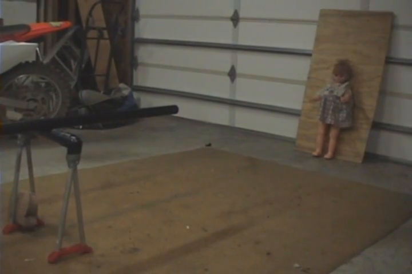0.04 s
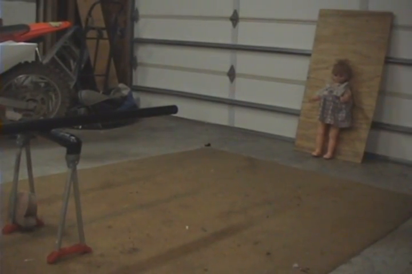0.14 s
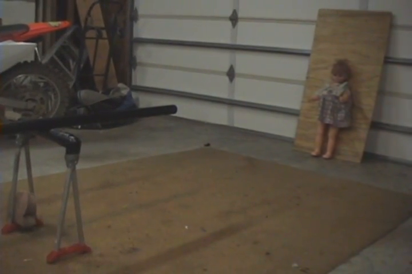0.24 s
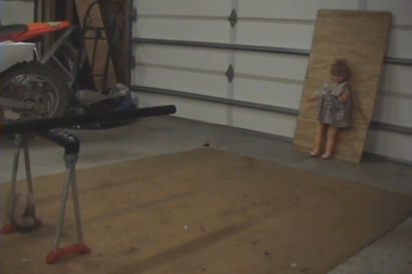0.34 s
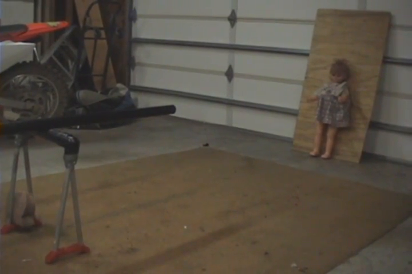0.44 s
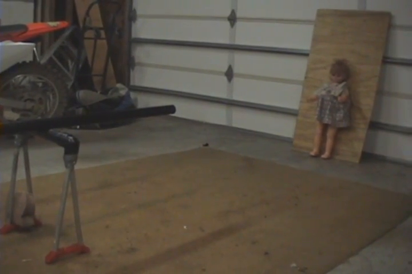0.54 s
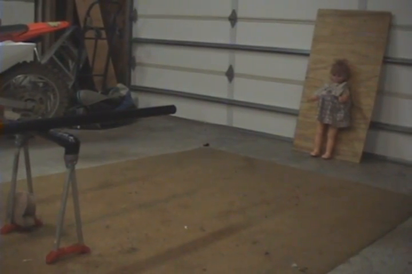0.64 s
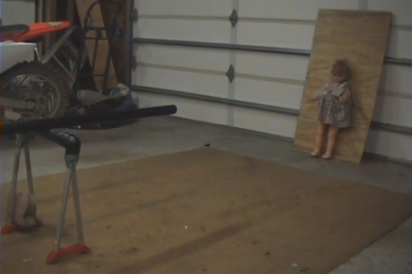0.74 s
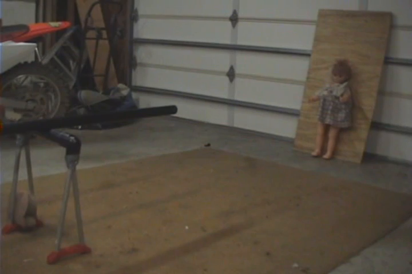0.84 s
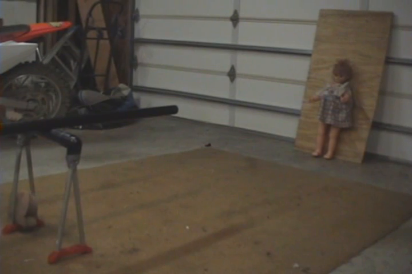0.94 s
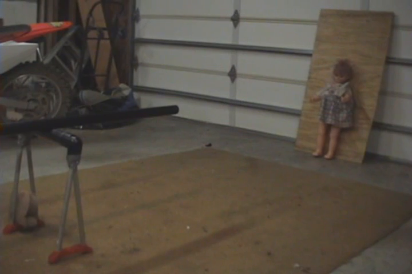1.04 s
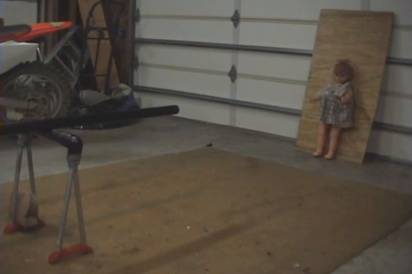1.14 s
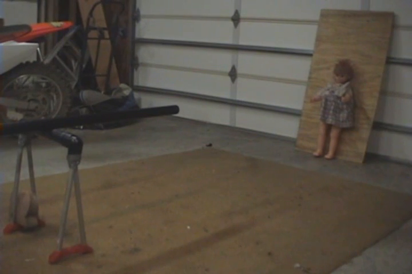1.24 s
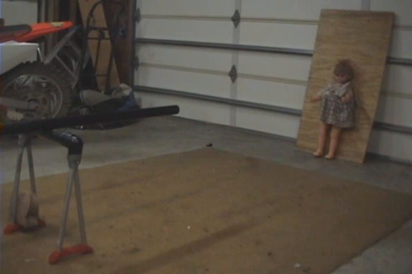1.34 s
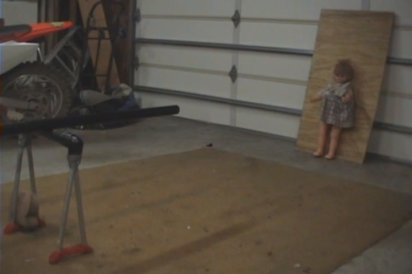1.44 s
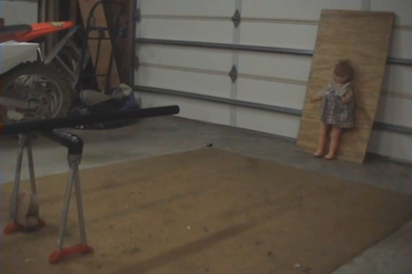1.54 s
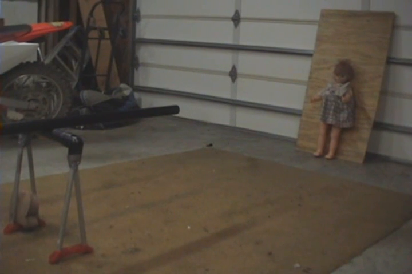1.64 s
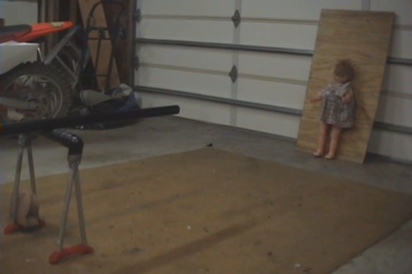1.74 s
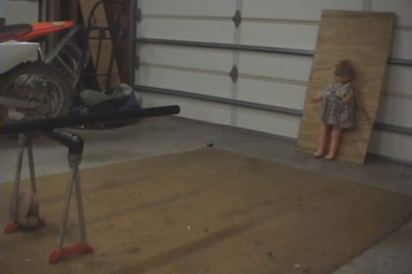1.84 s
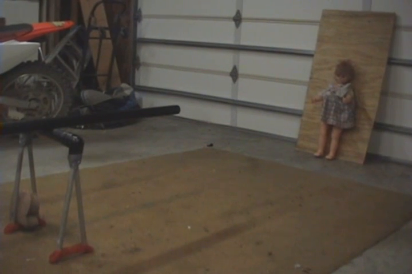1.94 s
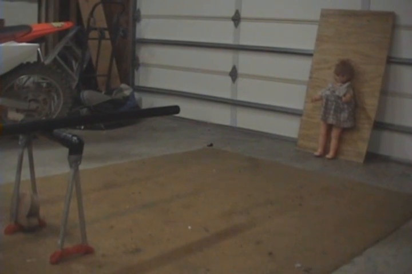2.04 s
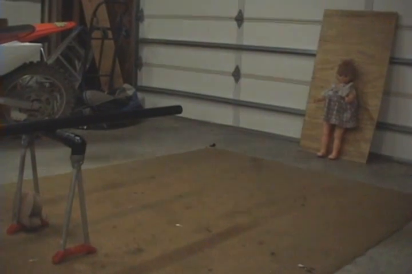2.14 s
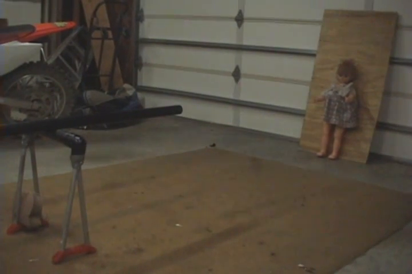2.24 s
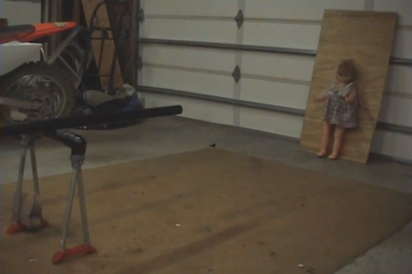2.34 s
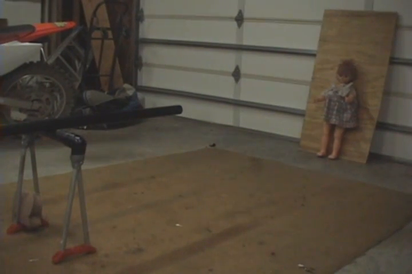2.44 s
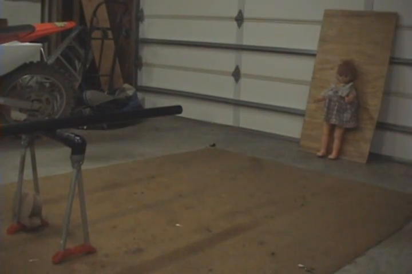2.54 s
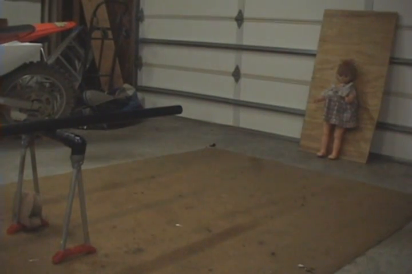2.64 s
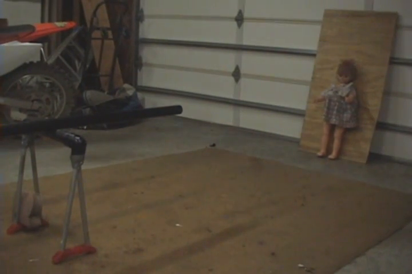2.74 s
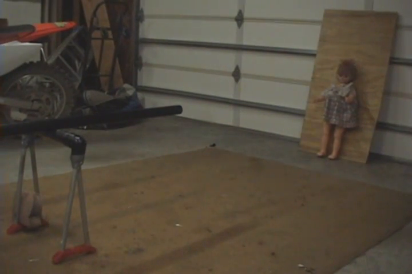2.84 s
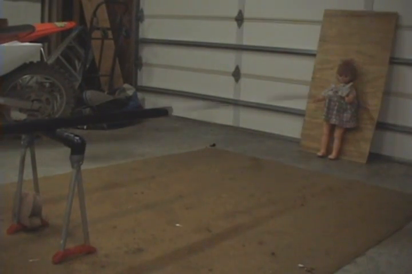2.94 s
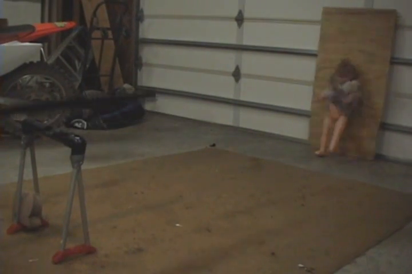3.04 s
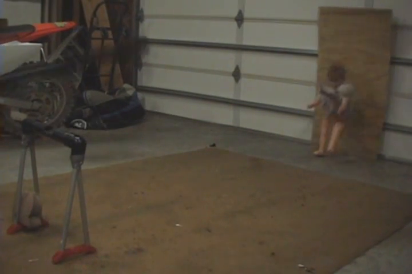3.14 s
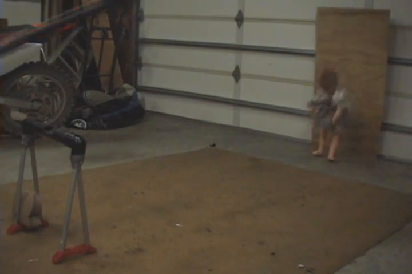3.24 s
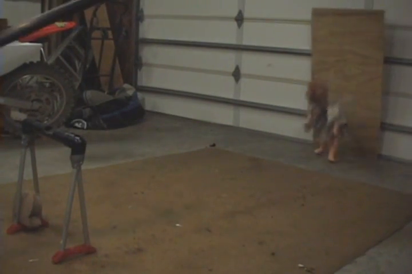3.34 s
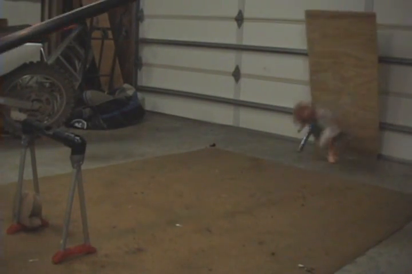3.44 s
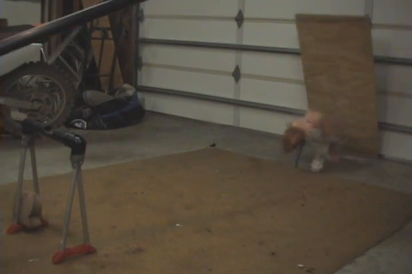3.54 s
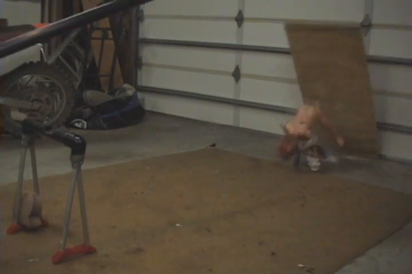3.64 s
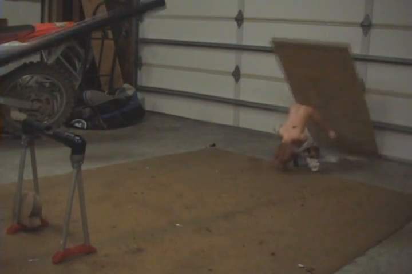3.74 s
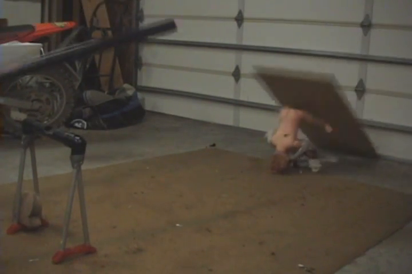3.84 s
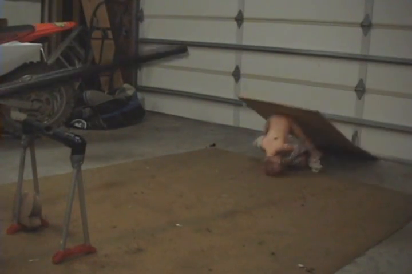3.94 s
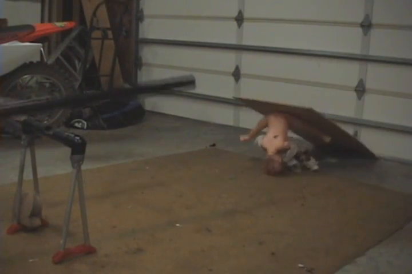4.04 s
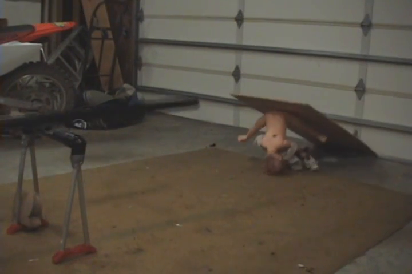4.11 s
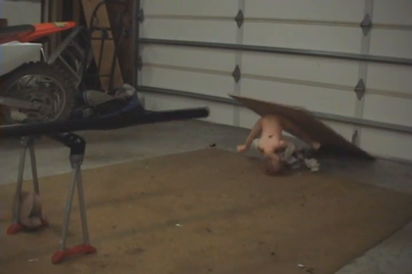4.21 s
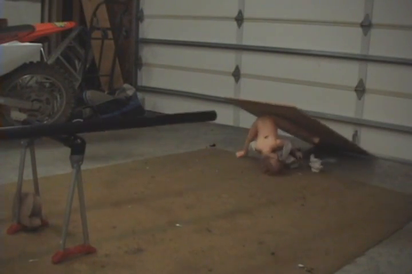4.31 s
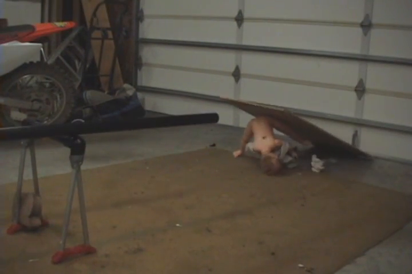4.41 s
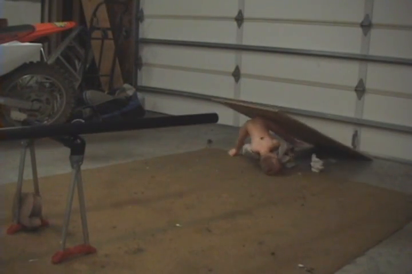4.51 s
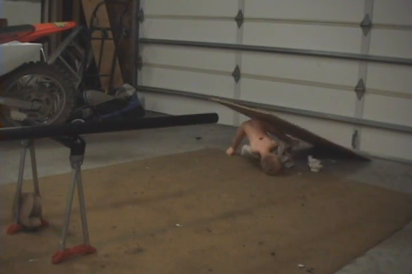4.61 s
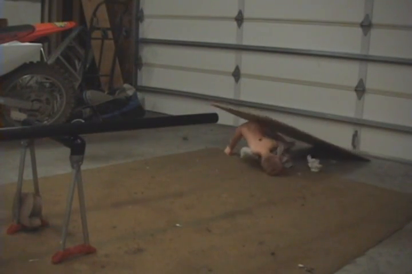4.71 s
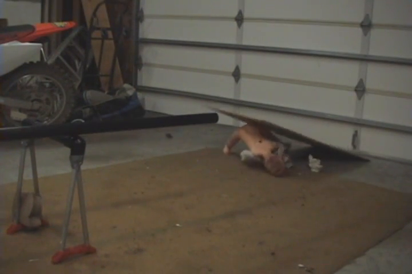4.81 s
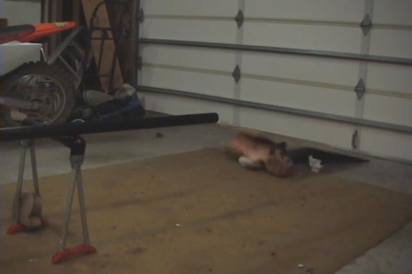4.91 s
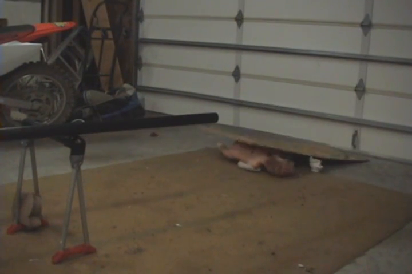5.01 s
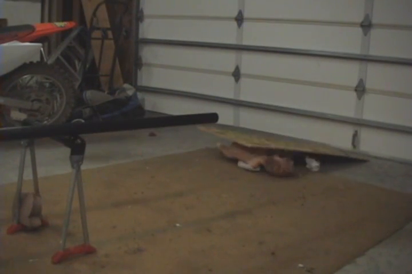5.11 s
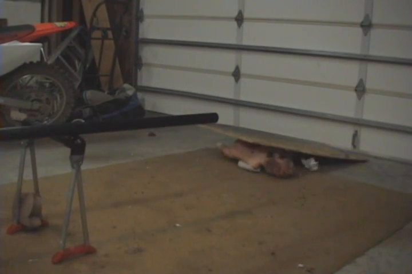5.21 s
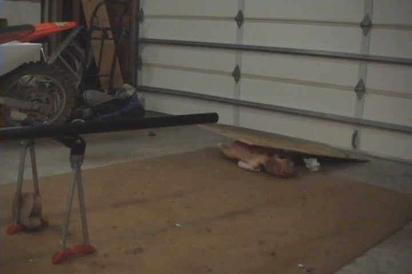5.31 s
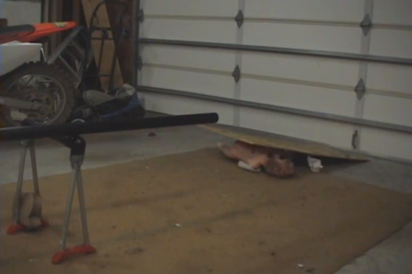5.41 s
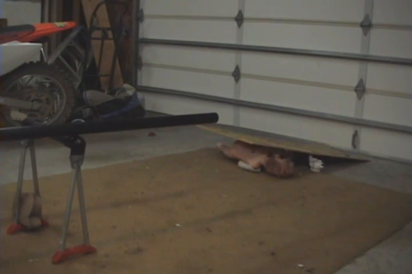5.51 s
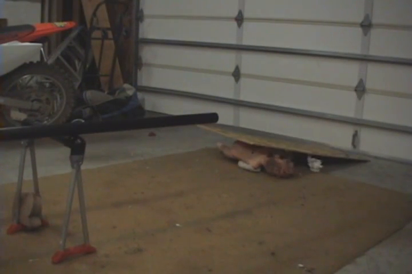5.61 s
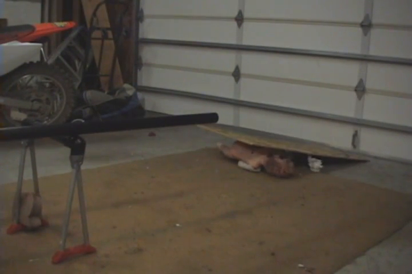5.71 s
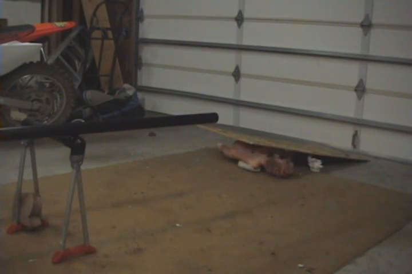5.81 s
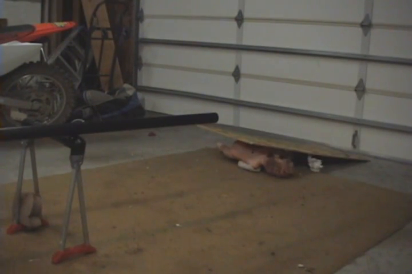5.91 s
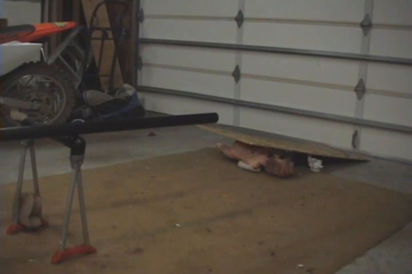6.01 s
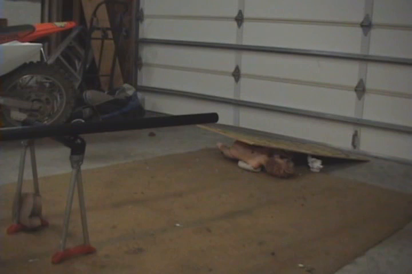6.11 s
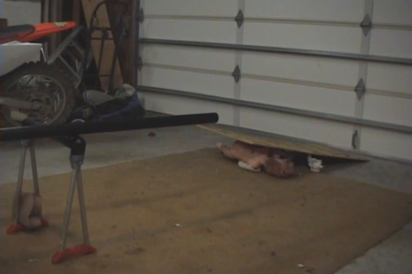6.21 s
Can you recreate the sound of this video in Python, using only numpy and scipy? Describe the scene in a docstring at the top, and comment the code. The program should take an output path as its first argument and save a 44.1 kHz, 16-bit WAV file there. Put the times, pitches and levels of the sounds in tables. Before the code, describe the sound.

Quiet garage rumble and small clicks, a sudden potato gun blast, then a hollow tumbling crash, a gritty scrape and bouncing board slaps.

```python
"""A few small plastic clicks and faint rustles over the rumble of a closed garage, then a potato gun fires.
The blast, noise bursts with a floor echo, overloads the camera's microphone and booms on in the room,
while steelwork and loose fittings ring as sines. A plywood board and a doll are knocked over and clatter
on the concrete, as filtered noise blows and short plastic bursts. Last the board slips off the doll
with a gritty scrape and slaps down in several bounces."""
import sys
import numpy as np
from scipy import signal
from scipy.fft import rfft, irfft, next_fast_len
from scipy.io import wavfile
from scipy.ndimage import uniform_filter1d, minimum_filter1d, map_coordinates

SR = 44100
rng = np.random.default_rng(int(sys.argv[2]) if len(sys.argv) > 2 else 0)


def waveform_to_disk(signal):
    """Save audio, clipped to [-1, 1], as 16-bit WAV at the path in sys.argv[1]."""
    frames = np.transpose(np.atleast_2d(signal))
    scaled = np.clip(frames, -1, 1) * 32767
    samples = np.round(scaled).astype(np.int16)
    wavfile.write(sys.argv[1], SR, samples)


N = 276319

SHOT_S = 3.0338  # the blast reaches the microphone

# Room rumble and its level before the overall trim: (frequency [Hz], density [dB per Hz]), (time [s], level [dB])
RUMBLE_SPECTRUM = [(12, -27.5), (20, -3.5), (43, 1), (174, -5), (260, -4), (300, -5.5), (759, -11.5),
                   (823, -11.5), (1090, -27.5), (2500, -31), (3250, -65.5), (5500, -120)]
RUMBLE_LEVEL = [(0.0, -54), (0.46, -52), (1.73, -51.5), (2.03, -51.5), (2.28, -55), (2.98, -57.5)]
# Microphone hiss: (frequency [Hz], density [dB per Hz])
HISS_SPECTRUM = [(350, -50), (600, -7), (800, -9.5), (1080, -5), (1220, -10.5), (1350, -10.5), (2120, -16),
                 (5540, -22), (11900, -33), (15400, -82), (22000, -120)]
# Faint steady tones: (frequency [Hz], start [s], end [s], rms level [dB])
WHINES = [(798, 0.046, 2.21, -64), (1064, 2.24, 2.46, -60.5)]
# Faint handling rustles: (start [s], length [s], level [dB])
RUSTLES = [(0.388, 0.031, -42), (1.08, .05, -54), (2.486, 0.072, -47), (5.803, 0.19, -52.5)]
# Colour of the rustles: (frequency [Hz], density [dB per Hz])
RUSTLE_SPECTRUM = [(200, -6), (700, 5.5), (1900, -3), (4000, -14.5), (11000, -23)]
# Small clicks before the shot: (time [s], level [dB], snap brightness [dB], pitch [ratio])
CLICKS = [(0.4233, -29, 11.5, 0.98), (1.663, -33, -19, 0.58), (1.6669, -30, -0.5, 0.82),
          (1.7081, -33.5, -22, 0.64), (1.919, -40, -24, 0.77), (2.0631, -20, -25, 0.96),
          (2.094, -35.5, -27, 0.445), (2.977, -47, 12, 0.98)]
# Modes of the clicking plastic at pitch ratio 1: (frequency [Hz], mean level [dB], decay t60 [s])
PLASTIC_MODES = [(670, -16, 0.013), (1006, 4.5, 0.021), (1420, 1, 0.0042), (1908, 2.5, 0.023),
                 (3390, -4.5, 0.014), (4730, -15, 0.024)]
# Board edge scraping on concrete: (frequency [Hz], density [dB per Hz])
SCRAPE_SPECTRUM = [(300, 5), (1000, -3), (2500, 3.5), (5000, -1.5), (8000, -7.5), (11000, -21)]
# Loose fittings and hard parts that ring when struck: (time [s], centre [Hz], level [dB], decay t60 [s])
RATTLES = [(3.159, 3160, 0, 0.4), (3.315, 3270, -8.5, .25), (3.425, 4210, -24, 0.42),
           (3.862, 4050, -29.5, 0.18), (3.929, 2300, -24, .16), (4.322, 4740, -27.5, 0.23)]
# The doll's hard plastic head and limbs clacking: (time [s], level [dB])
CLACKS = [(3.333, -8), (3.9309, -11.5), (4.0337, -8), (4.0542, -23), (4.082, -10.5), (4.128, -13),
          (4.253, -11.5)]
# Hollow plastic of the doll: (frequency [Hz], density [dB per Hz])
DOLL_SPECTRUM = [(400, -17), (1300, -5), (1800, 0), (2650, 3), (3300, -6), (5500, -10.5), (12000, -41)]
# Loose board dropping on the doll and slapping the floor; a low thud is a glancing edge:
# (time [s], strength [dB], hardness [0-1], thud [dB])
SLAPS = [(4.592, -6, 0.22, -5), (4.729, -16.5, 0.29, 0.5), (4.864, -24.5, 0.27, 11.5),
         (4.939, -10.5, 0.62, 6.5), (5.117, -19.5, 0.77, 3), (5.126, -13.5, 0.89, 2.5),
         (5.153, -4.5, 0.28, 3.5), (5.301, -10.5, 0.22, -4), (5.342, -1, 0.35, -4),
         (5.407, -17, 0.08, 10.5), (5.515, -11, 0.29, -8), (5.574, -18, 0.24, 4)]
# Colour of the slapping plywood: (frequency [Hz], gain [dB])
PLYWOOD_SPECTRUM = [(45, -4.5), (95, -4), (170, 13.5), (245, 17.5), (500, 13), (1000, 9.5), (2450, 7),
                    (6600, -2), (10000, -0.5), (12000, -27)]
# Resonances of the loose board: (frequency [Hz], width [Hz], level [dB])
BOARD_MODES = [(160.6, 21, 1), (243.2, 9.4, 5.1), (304.6, 9.1, 3.8), (347, 11, 5.8), (377.5, 11, 1.6),
               (456.4, 29, 7.4), (530.5, 12, 2.6), (604, 31, 4.2), (755, 45, 6.7), (1062, 25, 9.8),
               (1128, 20, 4.9), (1180, 12, -5), (1354, 20, 1.5), (1445, 10, 1.5)]
# Board and doll tumbling against the door and onto the floor; a low thud is a glancing edge:
# (time [s], strength [dB], hardness [0-1], thud [dB])
BLOWS = [(3.256, 0, 0.7, -7), (3.305, 7, 0.83, -4.5), (3.385, 14.5, 0.08, -7.5), (3.495, 6.5, 0.29, 0),
         (3.581, 0, 0.21, 1.5), (3.621, -3, 0.25, -6), (3.65, -12.5, 0.59, 4.5), (3.701, -10.5, 0.59, 5),
         (3.761, -10.5, 0.52, 4.5), (3.862, -16.5, 1, 2), (3.971, 0.5, 0.24, -1.5),
         (4.033, -10.5, 0.35, 1.5), (4.053, -2, .56, -0.5), (4.08, -4, 0.64, -2.5), (4.098, 2.5, 0.46, -7),
         (4.127, -1, 0.42, 0.5), (4.177, -2.5, 0.35, 0), (4.252, -8, 0.43, 5), (4.321, -6.5, 0.76, 1),
         (4.357, -4, 0.54, -3.5), (4.412, -12, 0.85, 2), (4.489, -15.5, 0.66, 7)]
# Colour of the tumbling: (frequency [Hz], gain [dB])
TUMBLE_SPECTRUM = [(45, -6.5), (95, -2), (170, 14.5), (245, 17.5), (870, 11.5), (2450, 7.5), (6600, 2.5),
                   (10000, 2.5), (12000, -32)]
# Resonances of the garage door: (frequency [Hz], width [Hz], level [dB])
DOOR_MODES = [(107.6, 10, -1.5), (150.3, 7.7, 9), (220, 8, -3.5), (282.5, 6, 3), (399.7, 26, 3),
              (447.5, 19, 0), (661, 9.8, 4), (696, 26, -3.5), (867, 19, -7), (1057, 26, -6), (1473, 27, -1),
              (3200, 190, -13), (5260, 130, -10)]
# Steel tracks and hinges set ringing by the blast: (frequency [Hz], relative level [dB])
STEEL_MODES = [(2828, 1), (2895, 4.5), (3016, -3), (3091, -2.5), (3212, -0.5), (3612, 0.5), (5123, -4),
               (5286, -5)]
# Bright crack of the blast: (frequency [Hz], density [dB per Hz])
CRACK_SPECTRUM = [(40, -10), (200, 1.5), (800, 2), (1600, 4.5), (3200, 5.5), (5500, 0.5), (8000, 0),
                  (11000, -5.5)]
# Dark boom of the blast: (frequency [Hz], density [dB per Hz])
BOOM_SPECTRUM = [(30, -22.5), (60, -14.5), (95, -21), (150, -10), (230, 1), (450, -6), (900, 0),
                 (1800, -5.5), (3200, -11.5), (5500, -17), (8000, -19), (11000, -14)]
# Reverberation of the garage before any stretch: (frequency [Hz], decay t60 [s])
GARAGE_DECAY = [(60, 1), (150, 0.61), (300, 0.68), (1000, 0.51), (3000, 0.45), (6000, 0.41), (11000, 0.26)]
# Left-right likeness of echoing sound, quiet sounds near the microphone, and sharp cracks:
# (frequency [Hz], likeness [0-1])
ECHO_ALIKE = [(30, 0.74), (60, 1), (130, 1), (270, 0.99), (570, 0.93), (1200, 0.85), (2500, 0.81),
              (5400, 1), (11000, 1)]
NEAR_ALIKE = [(60, 0.82), (140, 0.72), (350, 0.35), (830, 0.075), (1990, 0.28), (4760, 0.98), (11400, 1)]
SHARP_ALIKE = [(60, 0.74), (200, 0.32), (1000, 0.45), (2500, 0.68), (6000, 1), (11000, 0.88)]
# Stereo balance of the events: (frequency [Hz], left minus right [dB])
LEFT_BALANCE = [(100, -1), (400, .5), (1100, 2), (2000, 2), (4000, 0), (10000, -0.5)]


def amp(db):
    """Decibels to gain."""
    return 10 ** (np.asarray(db) / 20)


def unit(x):
    """x at rms 1."""
    return x / np.sqrt(np.mean(x ** 2) + 1e-20)


def along(points, hz):
    """(Hz, value) points read on a log frequency axis."""
    f, v = np.transpose(points)
    return np.interp(np.log(hz + 1), np.log(f + 1), v)


def fade(t, t60):
    """Exponential decay by 60 dB in t60 seconds."""
    return np.exp(-np.log(1000) * t / t60)


def add(track, s, sound):
    """Mix a sound into the track at time s."""
    part = track[:, round(s * SR):][:, :sound.shape[-1]]
    part += sound[..., :part.shape[-1]]


def filtered(x, response):
    """x times a response of frequency."""
    n = x.shape[-1]
    padded = next_fast_len(n + SR // 2)
    spectrum = rfft(x, padded) * response(np.fft.rfftfreq(padded, 1 / SR))
    return irfft(spectrum, padded)[..., :n]


def shaped(x, spectrum):
    """x given a spectrum by a causal minimum-phase filter, so that nothing sounds before an attack."""
    size = 4096
    cepstrum = irfft(np.log(amp(along(spectrum, np.fft.rfftfreq(size, 1 / SR)))))
    cepstrum[1:size // 2] *= 2
    cepstrum[size // 2 + 1:] = 0
    impulse = irfft(np.exp(rfft(cepstrum)))
    return signal.fftconvolve(x, impulse[None], axes=1)[:, :x.shape[1]]


def ringing(x, modes):
    """x through a panel that rings on at its resonances."""
    def panel(f):
        return 1 + sum(amp(db) * 1j * f * w / (c * c - f * f + 1j * f * w) for c, w, db in modes)
    return filtered(x, panel)


def wobble(rate):
    """A smooth random curve with rate knots a second."""
    knots = rng.standard_normal(int(N * rate / SR) + 4)
    return map_coordinates(knots, [np.arange(N) * rate / SR])


def air(size, alike=ECHO_ALIKE):
    """White stereo noise whose mid and side shares set the left-right likeness."""
    def mid_side(hz):
        turn = np.arccos(np.clip(along(alike, hz), 0, 1)) / 2
        return np.array([np.cos(turn), np.sin(turn)])
    mid, side = filtered(rng.standard_normal((2, size)), mid_side)
    return np.array([mid + side, mid - side])


def coloured(spectrum, size, alike=ECHO_ALIKE):
    """Stereo noise of rms 1 with the given spectrum."""
    return unit(filtered(air(size, alike), lambda hz: amp(along(spectrum, hz))))


def reverberate(noise, stretch=1):
    """Noise whose frequencies each die at the garage's rate, slowed by stretch."""
    hz, t, z = signal.stft(noise, SR, nperseg=512)
    decay = amp(-60 * t / (stretch * along(GARAGE_DECAY, hz)[:, None]))
    return signal.istft(z * decay, SR, nperseg=512)[1][:, :noise.shape[-1]]


def background(rumble_db=3.0, hiss_db=-56, unsteady_db=0.5, swell_s=0.066):
    """Low, unsteady room rumble, microphone hiss and faint sine whines."""
    t = np.arange(N) / SR
    level_db = np.interp(t, *np.transpose(RUMBLE_LEVEL)) + rumble_db
    level_db = level_db + unsteady_db * wobble(rate=9.1)
    rumble = amp(level_db) * coloured(RUMBLE_SPECTRUM, size=N, alike=NEAR_ALIKE)
    hiss = amp(hiss_db) * coloured(HISS_SPECTRUM, size=N, alike=NEAR_ALIKE)
    whine = np.zeros(N)
    for hz, on, off, db in WHINES:
        gate = np.clip(np.minimum(t - on, off - t) / swell_s, 0, 1)
        whine += np.sqrt(2) * amp(db) * gate * np.sin(2 * np.pi * hz * t)
    return rumble + hiss + whine


def rustles(grain_db=3):
    """Short rubs: noise made grainy by a fast random level, swelling and fading."""
    envelope = np.zeros((2, N))
    for s, length, db in RUSTLES:
        swell = np.sin(np.linspace(0, np.pi, round(length * SR)))
        add(envelope, s, amp(db) * swell)
    grain = amp(grain_db * wobble(rate=380))
    return envelope * unit(coloured(RUSTLE_SPECTRUM, size=N, alike=NEAR_ALIKE) * grain)


def clicks(ring_db=-3, snap_db=-5, snap_t60=0.014, room_db=-16, room_follows=.6,
           echo_s=.0056, echo_db=-16, left_db=1):
    """Plastic parts click nearby: short modes, a snap, a near reflection; sharper snaps wake more room."""
    out, t = np.zeros((2, N)), np.arange(SR // 2) / SR
    snap_spectrum = [(300, -10), (2000, 0.5), (8000, -5), (12000, -13.5)]
    room_spectrum = [(150, -12.5), (900, 4.0), (2000, -6.5), (4000, -9.0), (11000, -17.0)]
    for s, db, bright_db, pitch in CLICKS:
        ring = np.zeros(len(t))
        for hz, level, t60 in PLASTIC_MODES:
            ring += amp(level + rng.normal()) * np.sin(2 * np.pi * hz * pitch * t) * fade(t, t60)
        snap = coloured(snap_spectrum, size=len(t), alike=NEAR_ALIKE) * fade(t, snap_t60)
        room = reverberate(coloured(room_spectrum, size=len(t), alike=NEAR_ALIKE), stretch=0.62)
        direct = amp(ring_db) * ring + amp(bright_db + snap_db) * snap
        add(out, s, amp(db) * (direct + amp(room_db + room_follows * bright_db) * room))
        add(out, s + echo_s, amp(db + echo_db) * direct)
    thin = shaped(out, [(100, -3), (300, -11), (600, -1.5)])  # small parts radiate little bass
    return amp([[left_db], [-left_db]]) * thin


def slide(start_s=4.6, drop_s=5.12, level_db=-44, swell_db_per_s=16, release_db_per_s=45,
          attack_s=0.064, grit_db=4):
    """The board's edge slips off the doll and drags ever louder over gritty concrete until it drops."""
    t = np.arange(N) / SR
    effort_db = np.minimum(swell_db_per_s * (t - drop_s), release_db_per_s * (drop_s - t))
    grit = unit(coloured(SCRAPE_SPECTRUM, size=N) * amp(grit_db * wobble(rate=350)))
    attack = np.clip((t - start_s) / attack_s, 0, 1)
    return attack * amp(level_db + effort_db) * grit


def rattles(spread=.06):
    """Each loose part rings with a cluster of twelve close modes, scattered by spread around its centre."""
    out, t = np.zeros((2, N)), np.arange(SR) / SR
    for s, hz, db, t60 in RATTLES:
        modes = hz * (1 + spread * rng.standard_normal((12, 1)))
        ring = np.sin(2 * np.pi * (modes * t + rng.random(modes.shape))).sum(axis=0)
        add(out, s, amp(db) * unit(ring) * fade(t, t60))
    return out


def clacks(clack_db=0, t60=0.011, room_db=-17):
    """Hollow plastic gives a very short burst around one broad resonance, with a faint echo."""
    out, t = np.zeros((2, N)), np.arange(SR // 2) / SR
    for s, db in CLACKS:
        burst = coloured(DOLL_SPECTRUM, size=len(t), alike=SHARP_ALIKE) * fade(t, t60)
        room = reverberate(coloured(DOLL_SPECTRUM, size=len(t)))
        add(out, s, amp(db + clack_db) * (burst + amp(room_db) * room))
    return out


def blow_tone(hardness, thud_db, soft_hz=800, hard_octaves=3.92, thud_hz=465):
    """Harder contacts reach higher in the treble; below thud_hz the bass depends on how flat a blow lands."""
    corner_hz = soft_hz * 2 ** (hard_octaves * hardness)
    hz = np.geomspace(50, SR / 2, 24)
    bass_db = thud_db / (1 + (hz / thud_hz) ** 4)
    treble_loss_db = 20 * np.log10(1 + (hz / corner_hz) ** 2)
    return list(zip(hz, bass_db - treble_loss_db))


def strikes(rows, spectrum, direct_db, contact_t60, gather_s, rebound_db, rebound_s, flutter_db,
            edge_hz=500, first_share=0.77):
    """Each blow is a short noise contact, the garage's answer and a weaker rebound."""
    out, t = np.zeros((2, N)), np.arange(SR) / SR
    build = 1 - (1 - first_share) * np.exp(-t / gather_s)  # reflections gather for a moment before they die
    highpass = signal.butter(1, edge_hz, "high", fs=SR)
    for s, db, hardness, thud_db in rows:
        contact = signal.lfilter(*highpass, air(size=len(t)) * fade(t, contact_t60))
        clumps = unit(uniform_filter1d(rng.standard_normal(len(t)), size=130))
        echoes = amp(flutter_db * clumps)  # wall echoes arrive in clumps
        blow = amp(direct_db) * contact + build * echoes * reverberate(air(size=len(t)))
        rebound = amp(rebound_db) * build * reverberate(air(size=len(t)))
        add(blow, rebound_s * np.exp(.2 * rng.normal()), rebound)
        add(out, s, amp(db) * shaped(blow, blow_tone(hardness, thud_db)))
    return shaped(out, spectrum)


def slaps(level_db=-14.0):
    """The board, free of the door, bounces to rest and rings with its own resonances."""
    blows = strikes(SLAPS, PLYWOOD_SPECTRUM, direct_db=6.5, contact_t60=0.025, gather_s=0.0039,
                    rebound_db=-5, rebound_s=.012, flutter_db=1.4)
    return amp(level_db) * ringing(blows, BOARD_MODES)


def tumble(level_db=-12.0):
    """Board and doll topple while the board still leans on the door and makes it resonate."""
    blows = strikes(BLOWS, TUMBLE_SPECTRUM, direct_db=3, contact_t60=0.02, gather_s=0.0093,
                    rebound_db=-7.5, rebound_s=.028, flutter_db=1.75)
    return amp(level_db) * ringing(blows, DOOR_MODES)


def steel(ring_db=-6, t60=.6, attack_s=.03):
    """The blast shakes the door's steelwork, whose sine modes ring on under the boom."""
    out, t = np.zeros((2, N)), np.arange(SR) / SR
    ring = sum(amp(db) * np.sin(2 * np.pi * (hz * t + rng.random())) for hz, db in STEEL_MODES)
    add(out, SHOT_S, amp(ring_db) * ring * (1 - np.exp(-t / attack_s)) * fade(t, t60))
    return out


def shot(muzzle_db=46, crack_db=25, boom_db=19, swell_s=0.079, push_db=25, push_hz=200, push_t60=.09):
    """The muzzle wave and its floor echo, a bright crack off the walls, then the boom that builds up."""
    t = np.arange(2 * SR) / SR
    muzzle = amp(muzzle_db) * coloured(CRACK_SPECTRUM, size=len(t)) * fade(t, t60=0.0022)
    crack = reverberate(coloured(CRACK_SPECTRUM, size=len(t), alike=SHARP_ALIKE), stretch=0.99)
    boom = reverberate(coloured(BOOM_SPECTRUM, size=len(t)), stretch=1.6)
    boom = boom * (1 - np.exp(-(t / swell_s) ** 2))
    push = np.sin(2 * np.pi * push_hz * t) * fade(t, push_t60)  # gas column swinging in the barrel
    out = np.zeros((2, N))
    add(out, SHOT_S, muzzle + amp(crack_db) * crack + amp(boom_db) * boom)
    add(out, SHOT_S + 0.00098, muzzle)  # floor echo
    add(out, SHOT_S + 0.0227, amp(push_db) * push)
    return ringing(out, DOOR_MODES)


def scene():
    """Clicks, shot and crash share one left-right balance by frequency, over the background."""
    crash = tumble() + slaps() + clacks() + rattles() + slide()
    events = rustles() + clicks() + crash + steel() + shot()
    half = np.array([[.5], [-.5]])
    return filtered(events, lambda hz: amp(half * along(LEFT_BALANCE, hz))) + background()


def excess(x, threshold_db, release):
    """dB by which the held peak level lies over a threshold; the hold falls by release dB a second."""
    ramp = release * np.arange(N) / SR
    level = 20 * np.log10(np.abs(x).max(axis=0) + 1e-9)
    held = np.maximum.accumulate(level + ramp) - ramp
    over = np.maximum(held - threshold_db, 0)
    widened = -minimum_filter1d(-over, size=41)  # reaches slightly ahead of each peak
    return uniform_filter1d(widened, size=41)


def record(dry, saturation_db=18, lopsided=0.027, ceiling_db=-2.0, at_once=0.45, top_hz=12200):
    """The muzzle wave chokes the microphone, the preamplifier saturates and a limiter holds the rest down."""
    overload_db = excess(dry, threshold_db=24, release=360)
    late_db = np.pad(overload_db, (round(0.0017 * SR), 0))[:N]
    choke_db = at_once * overload_db + (1 - at_once) * late_db  # part of it sets in late
    drive = amp(saturation_db)
    driven = drive * (np.tanh(dry / drive + lopsided) - np.tanh(lopsided))  # uneven saturation adds rumble
    limit_db = excess(driven, threshold_db=ceiling_db, release=88)
    tone = [(8, -30), (25, -6), (120, -0.5), (7000, 2.0), (11500, -1.5)]
    out = shaped(driven * amp(-limit_db - choke_db), tone)
    return filtered(np.clip(out, -1, 1), lambda hz: np.clip((top_hz - hz) / 700, 0, 1) ** 2)


dry = scene()
out = record(dry)
waveform_to_disk(out)
```